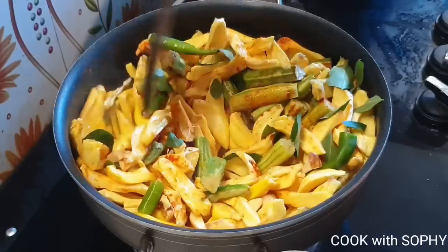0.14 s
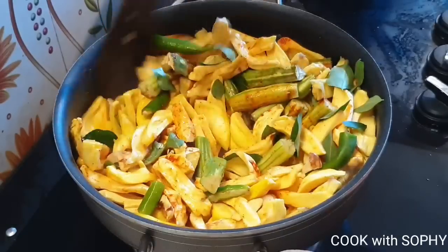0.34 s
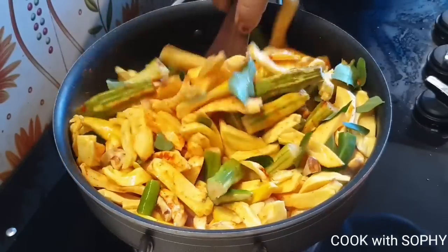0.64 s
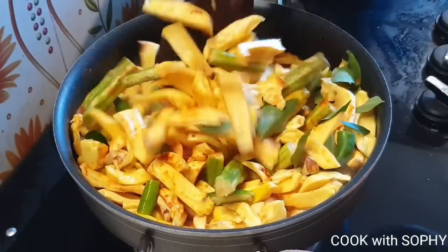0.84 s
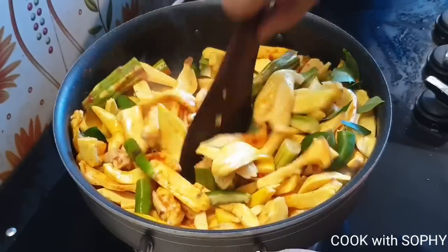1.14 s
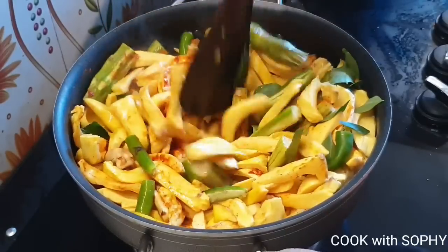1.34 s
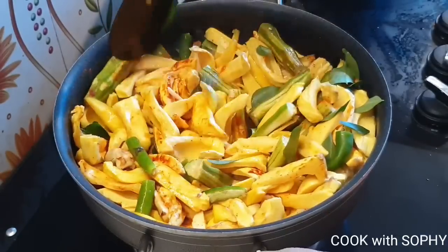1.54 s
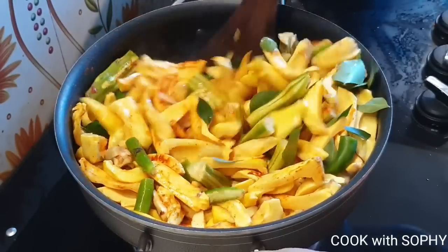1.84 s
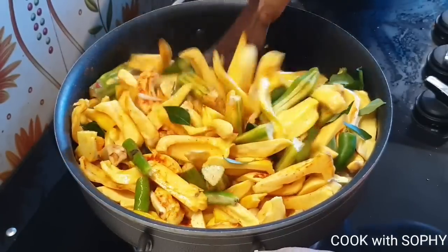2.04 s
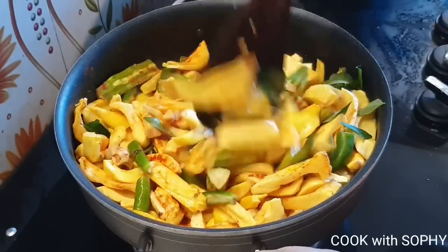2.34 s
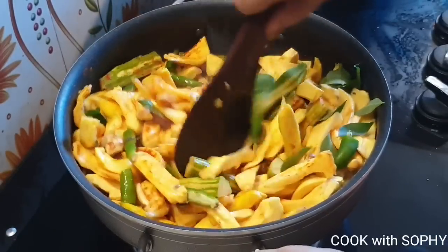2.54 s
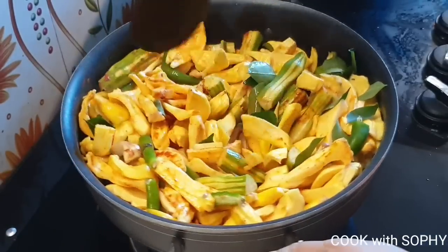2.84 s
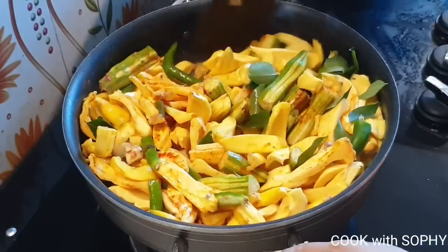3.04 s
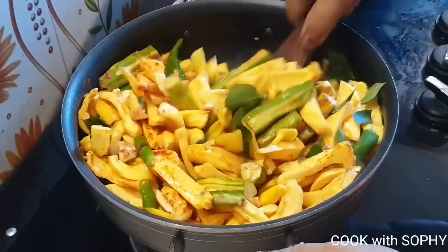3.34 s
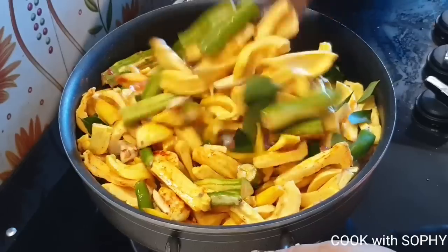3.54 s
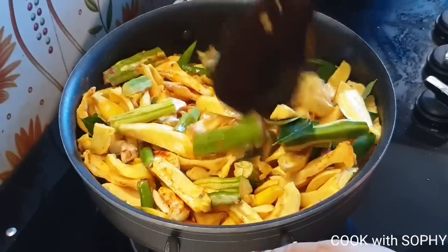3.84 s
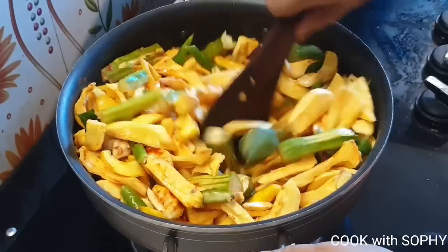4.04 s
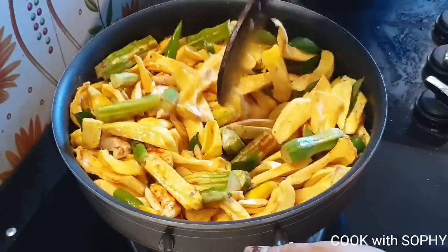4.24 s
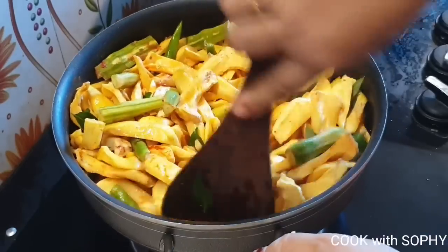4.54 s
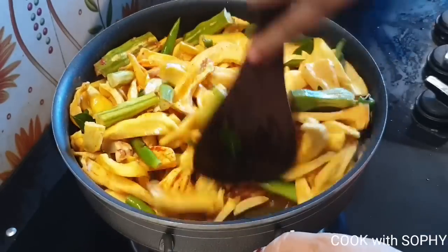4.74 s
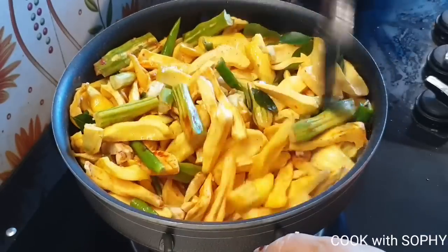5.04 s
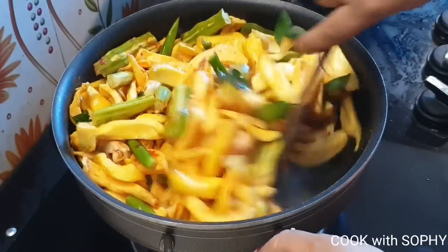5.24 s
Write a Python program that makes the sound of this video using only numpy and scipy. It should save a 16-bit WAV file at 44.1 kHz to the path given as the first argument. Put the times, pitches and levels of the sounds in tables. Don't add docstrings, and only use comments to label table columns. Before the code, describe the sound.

A wooden spatula turns moist chopped vegetables in a coated pan, squelching and scraping, with knocks that ring the metal, in a small kitchen.

```python
import sys
import numpy as np
from scipy import signal
from scipy.fft import rfft, irfft
from scipy.io import wavfile
from scipy.ndimage import uniform_filter1d

SR = 44100
rng = np.random.default_rng(int(sys.argv[2]) if len(sys.argv) > 2 else 0)


def output_pcm(signal):
    pcm = np.clip(np.atleast_2d(signal).T, -1, 1) * 32767
    wavfile.write(sys.argv[1], SR, np.round(pcm).astype(np.int16))


def gain_from_decibels(decibels):
    exponent = np.asarray(decibels, float) / 20
    return 10 ** exponent


N = 237919


def evened(x):
    return x / np.sqrt(np.mean(x ** 2) + 1e-20)


def smoothed(x, size):
    return uniform_filter1d(uniform_filter1d(x, size=size), size=size)


def read(points, hz):
    f, value = np.transpose(points)
    return np.interp(np.log(hz + 1), np.log(f + 1), value)


def curve(rows):
    s, db = np.transpose(rows)
    return np.interp(np.arange(N) / SR, s, db)


def add(mix, s, sound):
    part = mix[..., round(s * SR):][..., :sound.shape[-1]]
    part += sound[..., :part.shape[-1]]


def coloured(x, points):
    hz = abs(np.fft.fftfreq(4096, 1 / SR))
    log_gain = np.log(gain_from_decibels(np.maximum(read(points, hz), -90)))
    taps = np.fft.ifft(np.exp(np.conj(signal.hilbert(log_gain)))).real[:2048]
    return signal.oaconvolve(x, taps)[:len(x)]


def resonate(x, hz, width):
    turn = np.exp(2j * np.pi * np.cumsum(hz * np.ones(len(x))) / SR)
    r = np.exp(-np.pi * width / SR)
    return 2 * (turn * signal.lfilter([1 - r], [1, -r], x / turn)).real


def clicks(per_s, spread_db):
    chance = rng.random(N)
    sign = rng.choice([-1., 1.], N)
    size = rng.exponential(1, N)
    return (chance < per_s / SR) * sign * gain_from_decibels(spread_db * np.minimum(size, 4))


def rumble():
    # (frequency [Hz], level [dB per Hz])
    rumble_spectrum = [(12, -68), (20, -28), (46, -15.5), (65, -14), (113, -11), (129, -14), (203, -7.5),
                       (249, -28.5), (297, -16), (520, -37.5), (680, -32), (1140, -120)]
    # (frequency [Hz], width [Hz], level [dB])
    hum_tones = [(69.9, 7.6, -52.5), (103.7, 13.6, -47.5), (218, 18, -65), (306, 27, -68)]
    # (time [s], level [dB])
    swell = [(0.0, -45.5), (1.2, -46.5), (2.45, -44.5), (2.81, -48), (4.2, -44), (5.39, -47)]
    level_db = -47.5
    hz = np.fft.rfftfreq(N, 1 / SR)
    tones = 0
    for f, width, db in hum_tones:
        tones = tones + gain_from_decibels(db - level_db) / np.sqrt(width) / (1 + (2 * (hz - f) / width) ** 2)
    broad = gain_from_decibels(read(rumble_spectrum, hz))
    shape = gain_from_decibels(-5) * broad / np.sqrt((broad ** 2).sum() * hz[1]) + tones
    a, b = rfft(rng.standard_normal((2, N))) * shape
    apart = np.clip(0.13 + hz / 1400, 0, 1)
    swell_db = curve(swell)
    return gain_from_decibels(level_db + swell_db - swell_db.mean()) * evened(irfft([a + apart * b, a - apart * b], N))


def whistle():
    # (frequency [Hz], width [Hz], level [dB], left against right [dB])
    gas_jet = (9011, 420, -61, -9)
    hz, width, db, lr_db = gas_jet
    a, b, drift, flutter = rng.standard_normal((4, N))
    hz = hz + 40 * evened(smoothed(drift, 4000))
    db = db + 0.53 * evened(uniform_filter1d(flutter, size=1500))
    noises = (a, 0.23 * a + 1.2 * b)
    jet = [evened(resonate(resonate(x, hz, width), hz, width)) for x in noises]
    return gain_from_decibels(db + np.array([[lr_db], [-lr_db]]) / 2) * jet


def hiss():
    # (frequency [Hz], level [dB per Hz])
    hiss_spectrum = [(260, -40), (450, 2), (930, -7.5), (1180, -7.5), (3530, -17.5), (6000, -15),
                     (9090, -10.5), (14400, -16), (15500, -45)]
    # (frequency [Hz], likeness [0-1])
    likeness = [(60, 0.9), (150, 0.47), (380, 1), (950, 0), (2380, 0), (5980, 0.0), (15000, 0.14)]
    # (frequency [Hz], left against right [dB])
    balance = [(60, 4), (150, -7), (380, -1.5), (950, 5.5), (2380, 2.5), (5980, 3), (15000, -2)]
    frames, hz = N // 256 + 5, np.fft.rfftfreq(1024, 1 / SR)
    a, b, c, d, patches = rng.standard_normal((frames, 513, 5)).T
    patches = uniform_filter1d(patches, size=12, axis=0)
    patches = evened(uniform_filter1d(patches, size=10, axis=1))
    same = np.clip(read(likeness, hz), 0, 1)[:, None]
    left = a + 1j * b
    right = same * left + np.sqrt(1 - same ** 2) * (c + 1j * d)
    lean = gain_from_decibels(read(balance, hz) / 2)[:, None]
    z = np.array([left * lean, right / lean])
    z = z * gain_from_decibels(read(hiss_spectrum, hz)[:, None] + 2.0 * patches)
    air = signal.istft(z, nperseg=1024, noverlap=768)[1][:, :N]
    return gain_from_decibels(-62.5 + 3.0) * evened(air)


def stroke(since, hold, db, rise, fall_db_per_s):
    release_db = fall_db_per_s * np.clip(since - hold, 0, 1)
    return np.clip(since / rise, 0, 1) ** 2 * gain_from_decibels(2 * (db - release_db))


def motion():
    # (start [s], hold [s], squelch [dB], fine spray against it [dB])
    squeezes = [(0, 0.059, -62, -12), (0.32, .06, -61.5, -9), (0.415, 0.11, -58.5, -9),
                (0.564, .12, -56, -12), (0.925, 0.087, -63.5, -9), (1.13, 0.11, -60, -12),
                (1.23, 0.036, -54.5, -9), (1.36, 0.072, -65, -4), (1.66, 0.09, -50, -13),
                (1.725, .07, -47.5, -18), (1.934, .13, -59.5, -2), (2.29, 0.065, -64, -14),
                (2.464, 0.074, -54, -6), (2.63, 0.07, -59, 0), (3.038, 0.077, -44, -14),
                (3.146, 0.089, -58, -12), (3.225, 0.025, -56.5, -9), (3.315, 0.058, -57.5, -14),
                (3.975, 0.11, -54.5, -4), (4.572, 0.13, -49, -20), (5.162, .012, -61.5, 8),
                (5.243, 0.049, -51.5, 3.5), (5.27, 0.055, -51, -2)]
    # (start [s], hold [s], drag [dB], blade pitch [Hz], pressure [0-1])
    scrapes = [(0.03, 0.048, -53, 740, 1), (0.089, 0.023, -56, 1540, 0.3), (0.327, 0.4, -65.5, 1150, 0.2),
               (0.552, 0.14, -42, 1030, 0.68), (0.887, .06, -59, 1200, 0), (1.138, 0.14, -61, 1090, 0.14),
               (1.333, 0.1, -58, 1040, 0.3), (1.647, 0.078, -46, 1340, 0.15),
               (1.757, 0.042, -42, 1350, 0.2), (1.919, 0.091, -51.5, 1010, 0.05),
               (2.263, 0.033, -59.5, 1140, 0), (2.436, 0.082, -53, 1180, 0), (2.63, 0.14, -60, 1100, 0),
               (3.047, 0.11, -47.5, 1400, 0.1), (3.147, 0.05, -44, 1390, 0.25),
               (3.282, 0.098, -54, 1037, .6), (3.365, 0.077, -50, 1470, 0),
               (3.543, 0.046, -56.5, 1560, 0.26), (3.975, 0.14, -53.5, 1140, 0.03),
               (4.179, 0.068, -58, 736, 0), (4.564, 0.046, -40, 1300, 0), (4.657, 0.046, -39, 1300, 0),
               (5.239, .04, -44.5, 1300, 0), (5.287, 0.072, -44, 830, 0.5)]
    # (time [s], level [dB])
    settling = [(0, -65), (1.6, -65), (2.3, -62.5), (3.7, -64), (4.75, -62.5), (5.0, -73), (5.14, -95),
                (5.17, -62.5), (5.39, -64)]
    t = np.arange(0, N, 32) / SR
    wet = gain_from_decibels(2 * curve(settling)[::32])
    spray = wet * gain_from_decibels(2 * -18)
    drag = wet * gain_from_decibels(2 * -4)
    hz, pressure = drag * 1130, drag * 0.4
    for start, hold, db, blade_hz, press in scrapes:
        power = stroke(t - start, hold, db, rise=0.006, fall_db_per_s=248)
        bite = 1 + 0.15 * np.exp(-abs(t - start) / 0.1)
        drag = drag + power
        hz = hz + power * blade_hz * bite
        pressure = pressure + power * press
    for start, hold, db, spray_db in squeezes:
        power = stroke(t - start, hold, db, rise=0.013, fall_db_per_s=173)
        wet = wet + power
        spray = spray + power * gain_from_decibels(2 * spray_db)
    controls = (drag ** .5, hz / drag, wet ** .5, spray ** .5, pressure / drag)
    return [np.interp(np.arange(N) / SR, t, c) for c in controls]


def bursting_films():
    films = clicks(160, 3)
    pitch = rng.integers(0, 8, N)
    t = np.arange(300) / SR
    pops = np.zeros(N)
    for k, hz in enumerate(np.geomspace(1800, 11000, 8)):
        pop = np.sin(2 * np.pi * hz * t) * np.exp(-.35 * hz * t) * np.sqrt(hz)
        pops += signal.oaconvolve(films * (pitch == k), pop)[:N]
    return evened(pops)


def stir():
    # (frequency [Hz], level [dB per Hz])
    squelch_spectrum = [(880, -31.5), (1500, -1.5), (1810, -1.5), (2070, -5.5), (2940, -4), (5040, -6),
                        (5670, -4.5), (8970, -5), (13700, -13), (15500, -12)]
    # (frequency [Hz], level [dB per Hz])
    spray_spectrum = [(6000, -38), (10000, 3), (13000, 2), (16000, -6)]
    # (frequency [Hz], level [dB per Hz])
    drag_spectrum = [(200, -43), (450, -11), (1000, -9), (1800, -12), (2300, -11.5), (3300, -17.5),
                     (4500, -21.5), (7000, -32.5), (12000, -72)]
    # (multiple of its pitch [1], width [Hz], level [dB])
    blade_bands = [(1.0, 337, 13), (1.75, 400, -2.5), (2.9, 900, -3.5)]
    drag_gain, drag_hz, wet_gain, spray_gain, pressure = motion()
    pressure = np.clip(pressure, 0, 1)
    slips, grains = evened(clicks(900, 1.02)), evened(clicks(2500, 2.5))
    pops = bursting_films()
    chatter = evened(gain_from_decibels(2.5 * evened(smoothed(rng.standard_normal(N), 300))))
    out = []
    for rub, wet_noise in rng.standard_normal((2, 2, N)):
        rustle = evened(coloured(slips + 1.43 * rub, drag_spectrum))
        song = np.zeros(N)
        for k, width, db in blade_bands:
            band = resonate(slips + 1.05 * rub, k * drag_hz, width)
            song += gain_from_decibels(db) * resonate(band, k * drag_hz, width)
        drag = np.sqrt(1 - pressure) * rustle + np.sqrt(pressure) * evened(song)
        fizz = evened(coloured(.55 * grains + wet_noise, squelch_spectrum))
        squelch = gain_from_decibels(3.0) * (fizz + 0.43 * pops)
        spray = evened(coloured(grains + rub, spray_spectrum))
        out.append(drag_gain * chatter * drag + wet_gain * squelch + spray_gain * spray)
    return np.array(out)


def blow(db, hz, crack_db, t60, hardness_db):
    # (frequency [Hz], level [dB per Hz])
    crack_spectrum = [(1470, -49), (2500, 0.5), (3660, -6), (4260, 2.5), (6540, 2), (8100, -3.5),
                      (10400, -4.5), (15300, -16.5), (16700, -1.5)]
    t = np.arange(round(.15 * SR)) / SR
    overtones = [(.55, -13 + hardness_db), (.86, -11.5), (1, 2.5), (1.17, -14),
                 (1.8, -11.5 + hardness_db), (2.7, -11 + hardness_db)]
    note = sum(gain_from_decibels(rel_db - 60 * t * k / t60) * np.sin(2 * np.pi * hz * k * t) for k, rel_db in overtones)
    rise = 1 - np.exp(-t * hz / 0.08)
    low_cut = signal.butter(2, 0.4 * hz, "high", fs=SR, output="sos")
    note = signal.sosfilt(low_cut, rise * note)
    crackle = rng.standard_normal((2, len(t))) * (gain_from_decibels(9.5 - 60 * t / 0.0012) + gain_from_decibels(-2 - 60 * t / 0.041))
    snap = np.zeros(len(t))
    snap[0], snap[28] = 5.9, -1.7
    unit = np.linalg.norm(coloured(1. * (t == 0), crack_spectrum))
    crack = np.array([coloured(port + snap, crack_spectrum) for port in crackle]) / unit
    return gain_from_decibels(db) * (0.62 * note + gain_from_decibels(crack_db + 2.5) * crack)


def taps():
    # (time [s], blow [dB], wood pitch [Hz], crack against the blow [dB], left against right [dB])
    soft_taps = [(.019, -26, 705, -25, -1), (.086, -36.5, 1640, -24, 14.5), (0.5626, -15, 1367, -27, -1),
                 (.572, -30, 1620, -8, -4), (0.674, -29, 1100, -12, 1), (.94, -43, 1050, -9, 4),
                 (1.337, -34, 1130, -30, 4), (1.966, -36, 1080, 0, 10), (2.473, -38.5, 1170, 14.5, 4),
                 (2.545, -49, 1720, 13, -1), (2.663, -33.5, 1115, 1, 1.5), (3.394, -36, 1490, -19, 4),
                 (3.445, -29, 1810, -22, 1.2), (3.972, -42.5, 1130, 5, 1.2), (4.018, -34, 1060, 5, -1),
                 (4.053, -39.5, 2940, 13.5, -5), (4.073, -28, 1780, -24, -2.2), (4.104, -40, 2570, -12, 0),
                 (4.217, -38, 659, -1, -.6), (4.953, -48, 1160, -19, 12), (5.154, -52, 1194, -16, 13),
                 (5.248, -31, 1390, -23, 2)]
    out = np.zeros((2, N))
    for s, db, hz, crack_db, lr_db in soft_taps:
        t60 = 0.017 * (1 + (796 / hz) ** 5.9)
        tap = blow(db, hz, crack_db - 20.0, t60, hardness_db=-3.5)
        add(out, s, tap * gain_from_decibels([[lr_db / 2], [-lr_db / 2]]))
    return out


def ring(modes, t):
    phase = rng.uniform(-np.pi, np.pi, len(modes))
    side = rng.choice([-1, 1], len(modes))
    flutter_db = 2.5 * evened(smoothed(rng.standard_normal((len(modes), len(t))), 260))
    out = np.zeros((2, len(t)))
    for (hz, db, t60), p, d, wobble in zip(modes, phase, side, flutter_db):
        skew = min(hz / 1500, 1) * np.array([[0], [np.pi / 2]])
        out += gain_from_decibels(db + wobble - 60 * t / t60) * np.sin(2 * np.pi * hz * t + p + d * skew)
    return out


def knocks():
    # (time [s], blow [dB], wood pitch [Hz], crack against the blow [dB], wood decay [s])
    hard_knocks = [(1.6479, -17, 760, -6, 0.0049), (1.7221, -11.5, 1110, -26, 0.0057),
                   (1.7502, -16.5, 1040, -24.5, 0.0052), (3.0204, -13.5, 1590, -8.5, 0.003),
                   (3.1259, -16.5, 1480, -17, 0.011), (3.1416, -19, 1130, -21.5, 0.0089),
                   (4.563, -22, 740, -10, 0.023), (4.6443, -13, 1262, -21, 0.022),
                   (4.6783, -7.5, 2325, -26.5, 0.012)]
    # (landing spot, ring [dB], time until wood or food damps the pan [s])
    landings = [("rim", -29, .058), ("base", -23, .033), ("bounce", -37, .095), ("side", -31, .09),
                ("side", -29, .03), ("bounce", -35, .08), ("rim", -20.5, .093), ("flat", -24.5, .15),
                ("flat", -38, .115)]
    spots = {"rim": (-18, -2.1, -3.5, -12.5, -7, -10.5), "side": (-8, -2.5, -22, -1.3, -31, -6.5),
             "base": (-14.5, -28, -30, -11, 0.8, -9.5), "flat": (-14, -22, -11, -5.5, .1, -13),
             "bounce": (-16.5, -10, -1.5, -4, -2, 0)}
    # (frequency [Hz], level [dB], t60 [s])
    pan_modes = [
        [(355, -2, .3), (470, -4, .12), (580, -3, .1), (775, 0, .17)],
        [(1384, -7, .2), (2218, 0, .16), (4414, -14, .07)],
        [(3106, 0, .12), (3135, -5, .2), (5319, -3, .075), (6550, -10, .025), (7784, -12, .1)],
        [(2046, 0, .5)],
        [(1190, -10, .2), (1421, 0, .13)],
        [(1663, -2, .13), (2724, 0, .12), (4043, -4, .07), (4330, -3, .03)],
    ]
    wood, metal = np.zeros((2, N)), np.zeros((2, N))
    t = np.arange(round(.3 * SR)) / SR
    for (s, *hit), (spot, ring_db, muted) in zip(hard_knocks, landings):
        add(wood, s, blow(*hit, hardness_db=5.0))
        free = (1 - np.exp(-t / 0.00014)) * gain_from_decibels(ring_db - 60 * np.maximum(t - muted, 0) / 0.014)
        add(metal, s, free * sum(gain_from_decibels(db) * ring(modes, t) for db, modes in zip(spots[spot], pan_modes)))
    return wood, metal


def kitchen(x):
    # (frequency [Hz], t60 [s])
    room_decay = [(250, 0.28), (800, 0.31), (2000, 0.25), (5000, 0.23), (12000, 0.11)]
    hits = np.zeros((2, SR // 2))
    at = np.arange(160, SR // 2 - 20, 20)
    at = at + rng.integers(0, 20, (2, len(at)))
    np.put_along_axis(hits, at, rng.choice([-1., 1.], at.shape), 1)
    hits[1] = 0.3 * hits[0] + 1.2 * hits[1]
    hz, t, z = signal.stft(hits, SR, nperseg=256)
    tail = signal.istft(z * gain_from_decibels(-60 * t / read(room_decay, hz)[:, None]), SR, nperseg=256)[1]
    tail = tail / np.linalg.norm(tail, axis=1, keepdims=True)
    return signal.fftconvolve(x[None], tail, axes=1)[:, :N]


def ports(x):
    # (frequency [Hz], level against left [dB])
    right_opening = [(60, 2.5), (6000, -2.5), (8000, -0.5), (8800, 2), (11000, 4.5), (13500, 0),
                     (16000, -4)]
    return np.array([x[0], coloured(np.roll(x[1], 2), right_opening)])


def scene():
    background = rumble() + whistle() + hiss()
    stirred, tapped = stir(), taps()
    wood, metal = knocks()
    to_room = gain_from_decibels(-6.0) * wood[0] + gain_from_decibels(-11) * metal[0]
    to_room = to_room + gain_from_decibels(-8) * tapped.mean(0) + gain_from_decibels(-11) * stirred[0]
    return metal + ports(wood + tapped + stirred + kitchen(to_room)) + background


def top_cut(x):
    return signal.sosfilt(signal.butter(12, 15600, fs=SR, output="sos"), x)


def record(dry):
    return top_cut(dry)


dry = scene()
out = record(dry)
output_pcm(out)
```